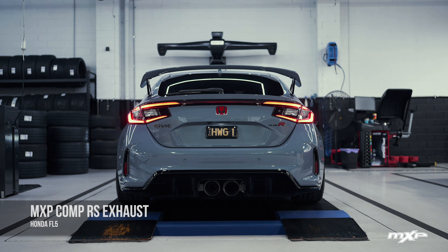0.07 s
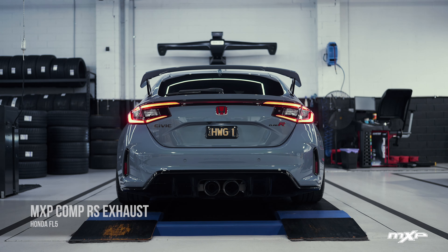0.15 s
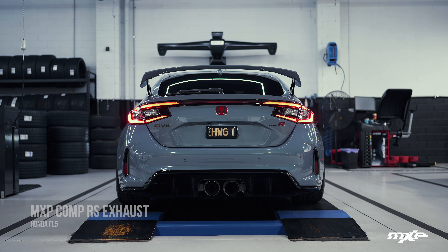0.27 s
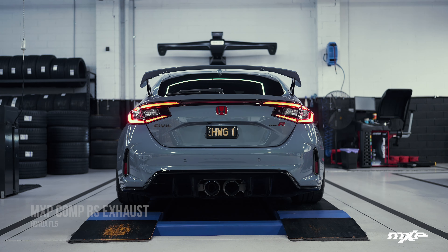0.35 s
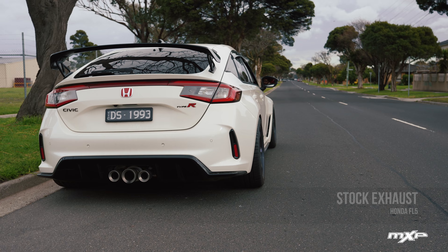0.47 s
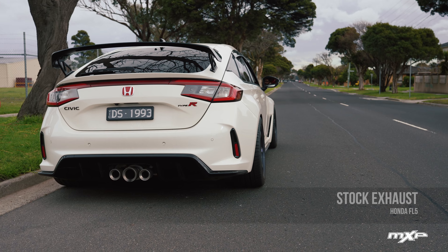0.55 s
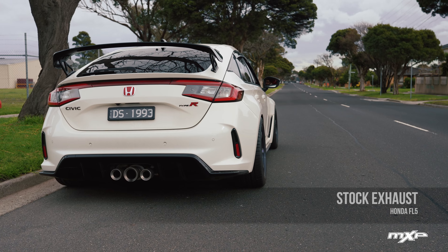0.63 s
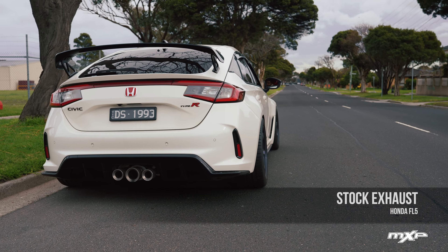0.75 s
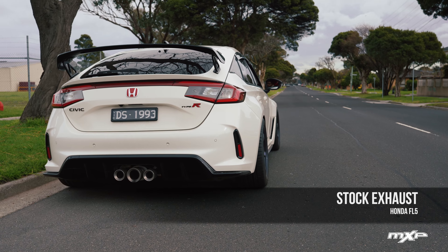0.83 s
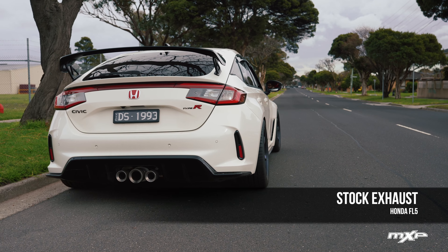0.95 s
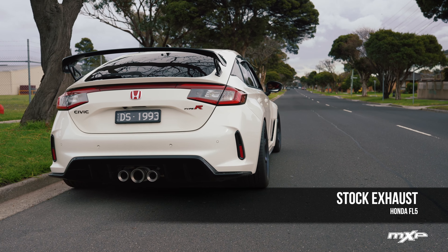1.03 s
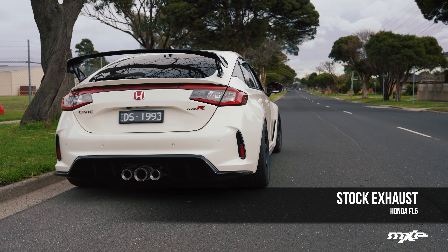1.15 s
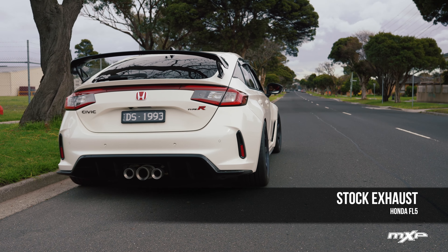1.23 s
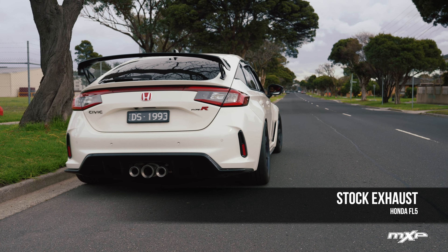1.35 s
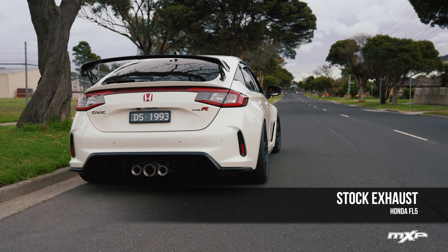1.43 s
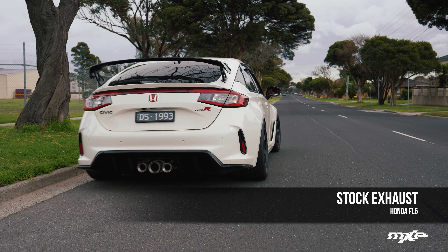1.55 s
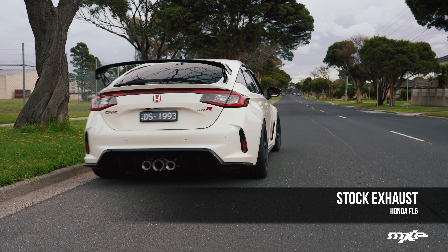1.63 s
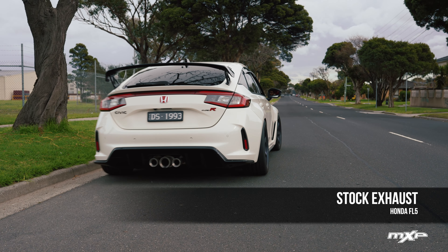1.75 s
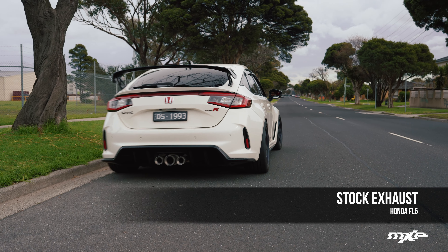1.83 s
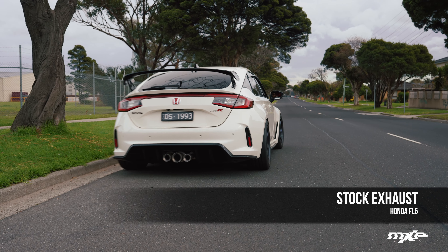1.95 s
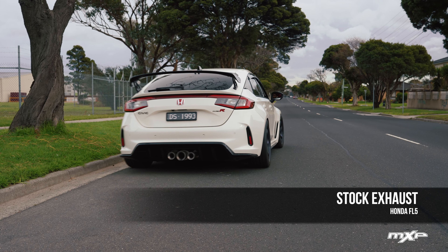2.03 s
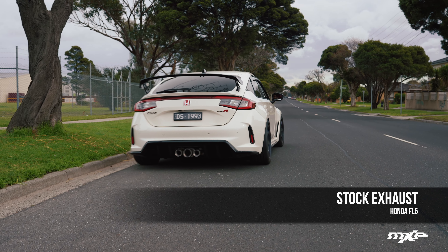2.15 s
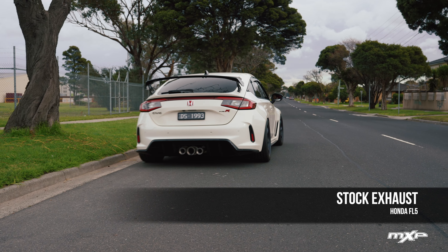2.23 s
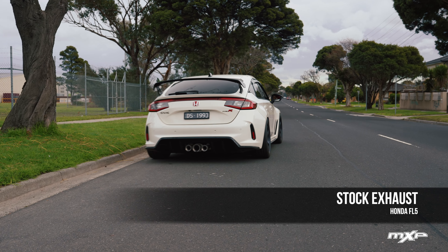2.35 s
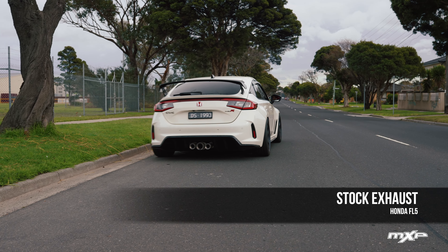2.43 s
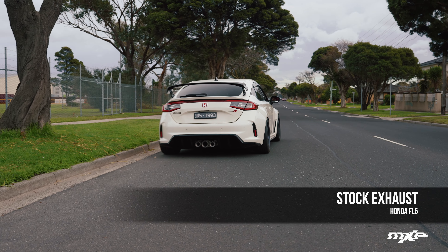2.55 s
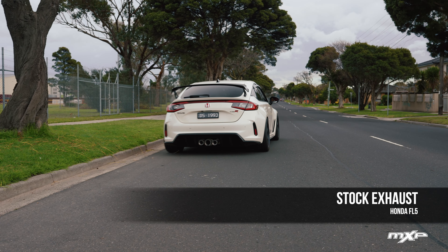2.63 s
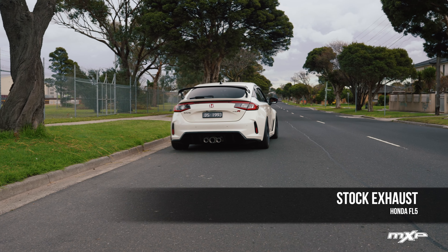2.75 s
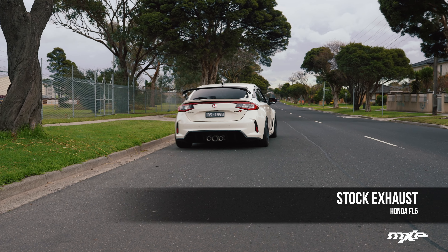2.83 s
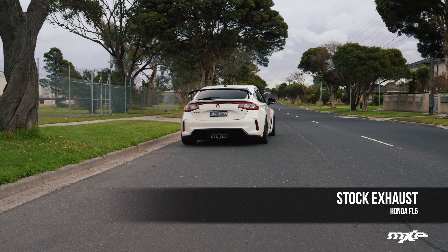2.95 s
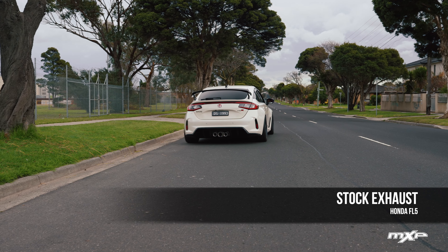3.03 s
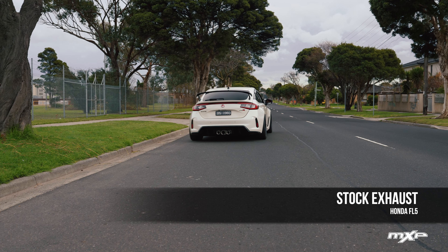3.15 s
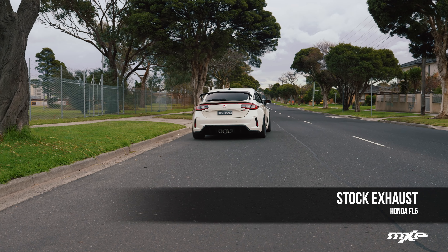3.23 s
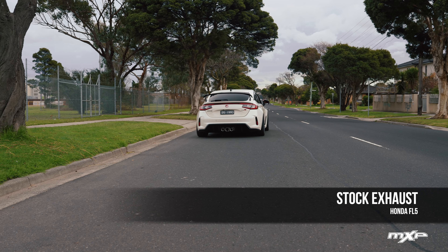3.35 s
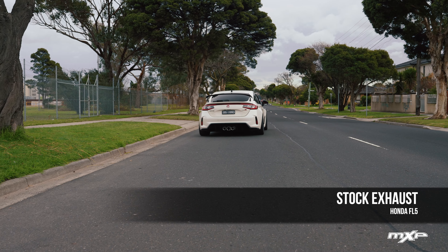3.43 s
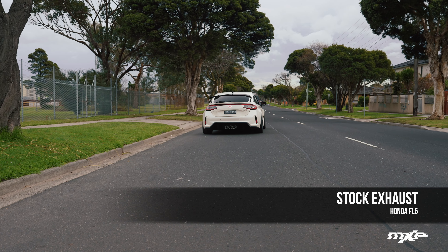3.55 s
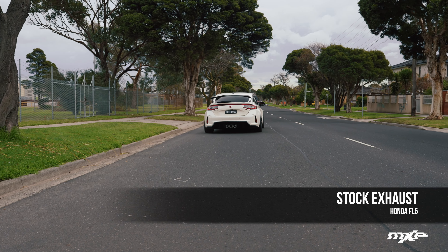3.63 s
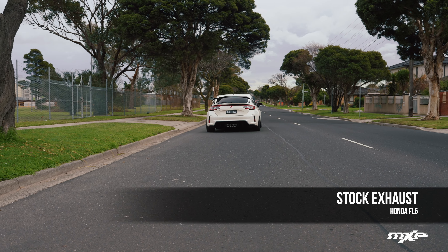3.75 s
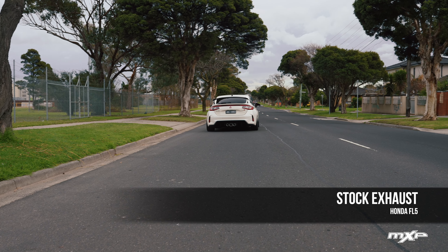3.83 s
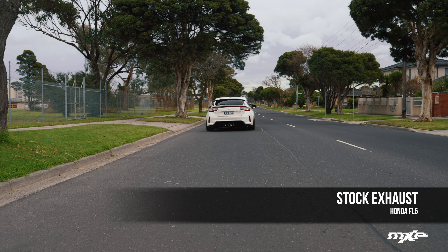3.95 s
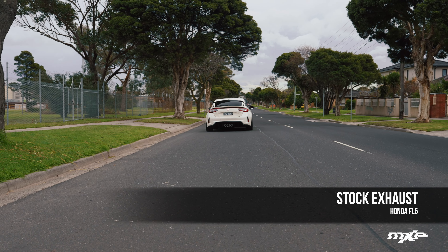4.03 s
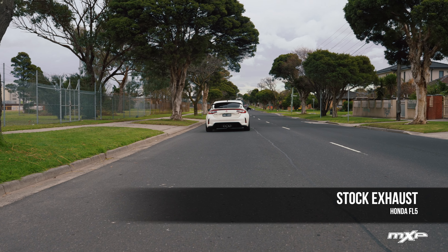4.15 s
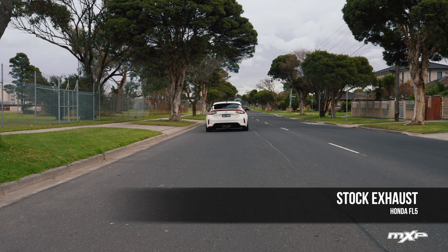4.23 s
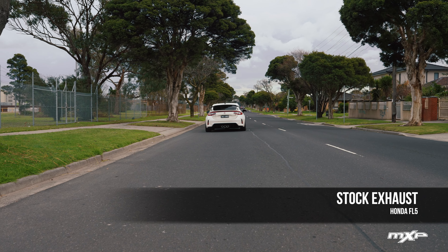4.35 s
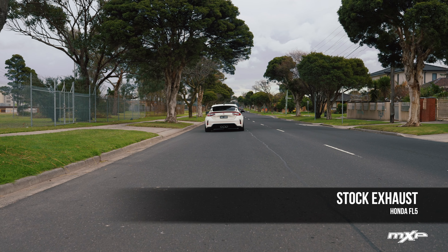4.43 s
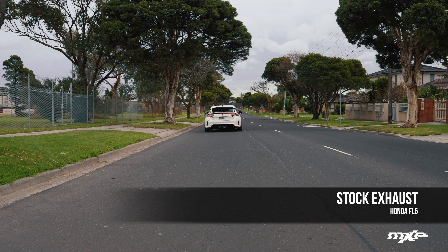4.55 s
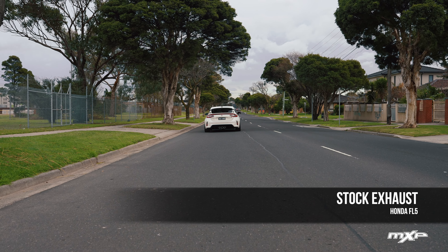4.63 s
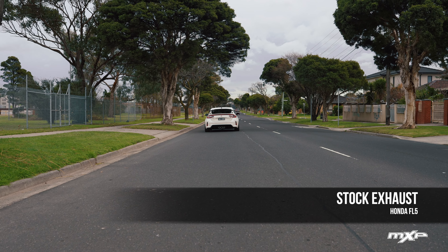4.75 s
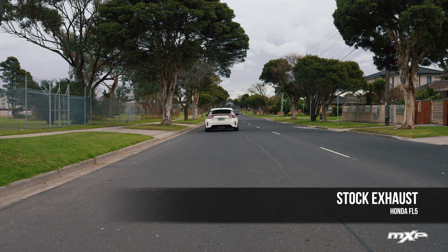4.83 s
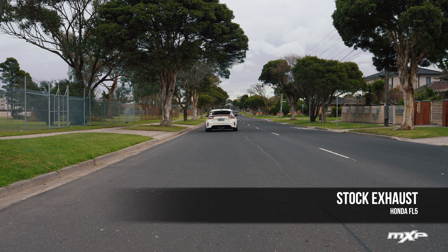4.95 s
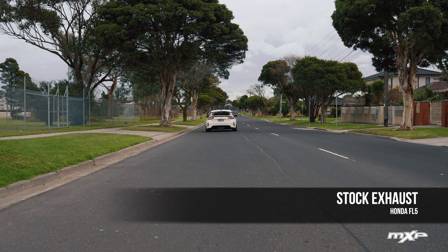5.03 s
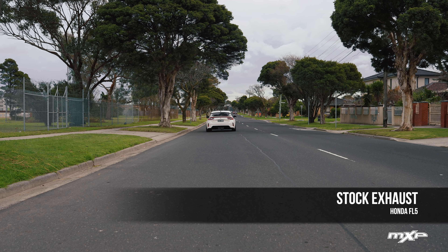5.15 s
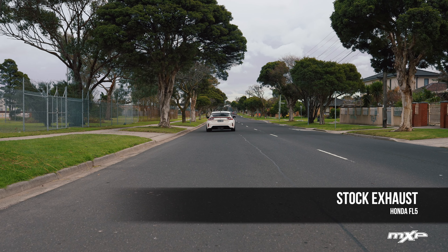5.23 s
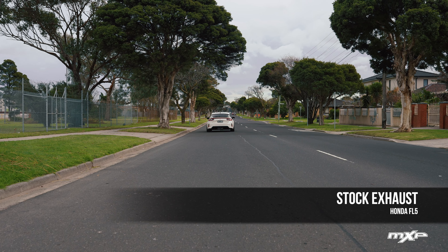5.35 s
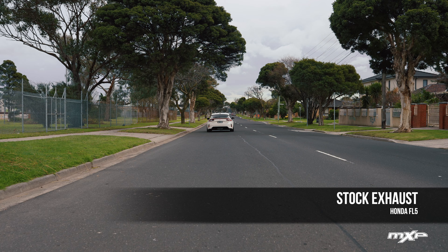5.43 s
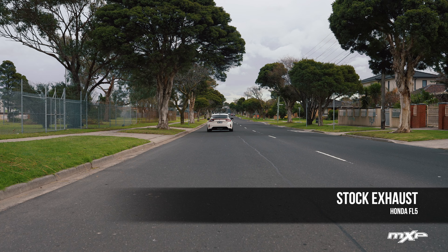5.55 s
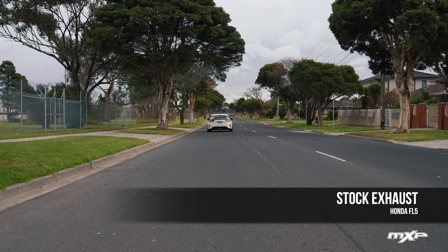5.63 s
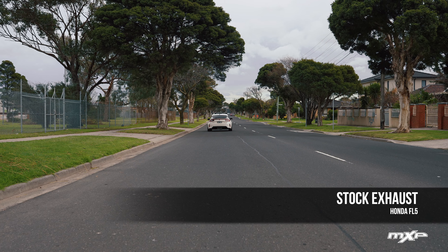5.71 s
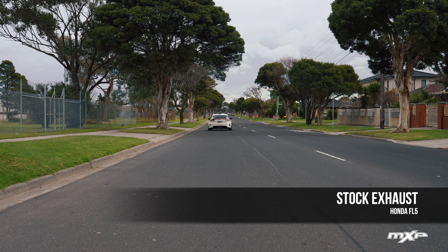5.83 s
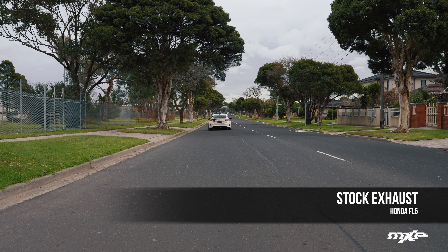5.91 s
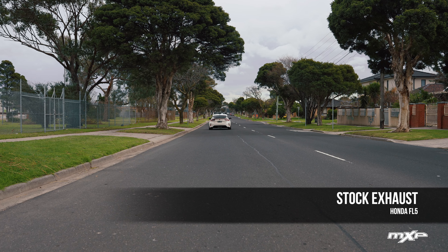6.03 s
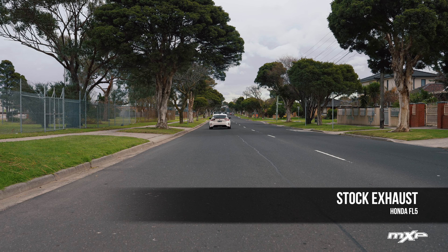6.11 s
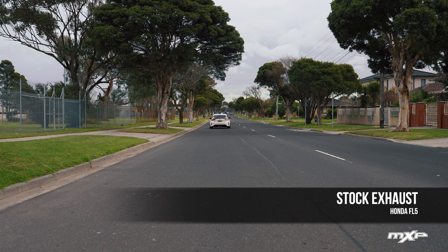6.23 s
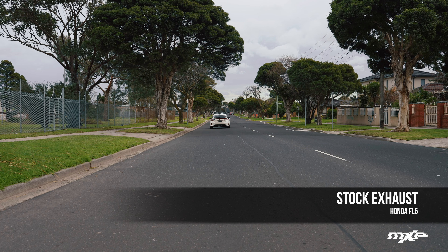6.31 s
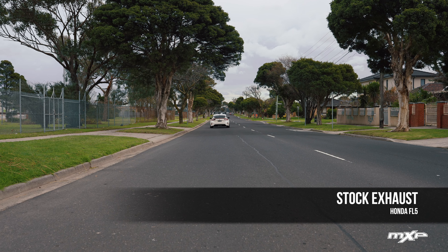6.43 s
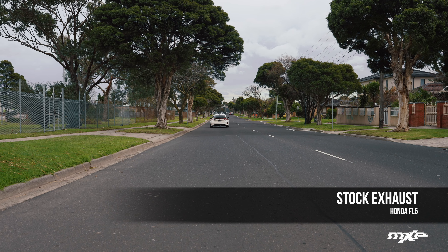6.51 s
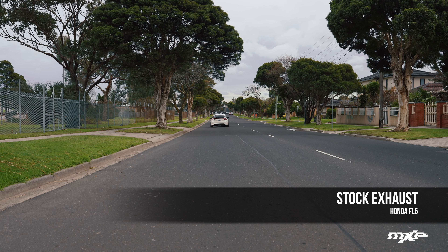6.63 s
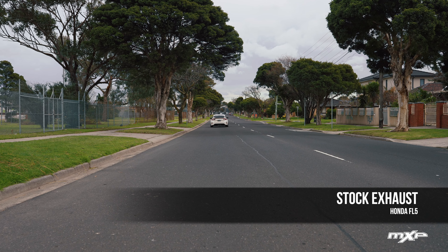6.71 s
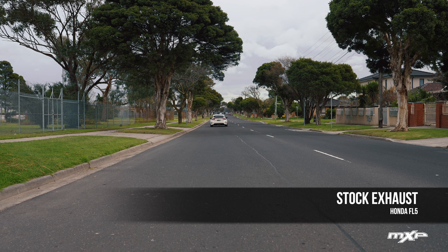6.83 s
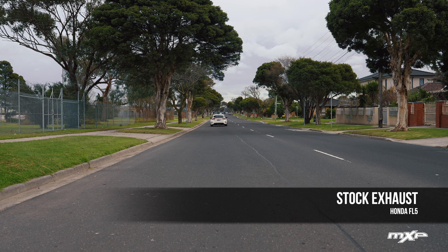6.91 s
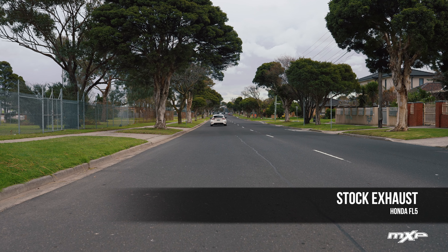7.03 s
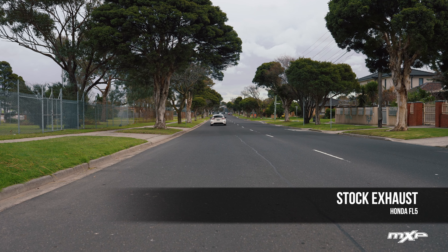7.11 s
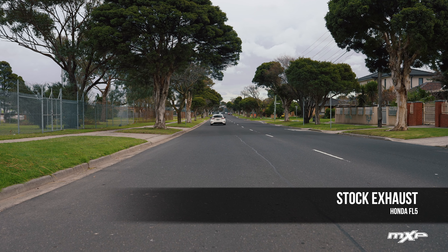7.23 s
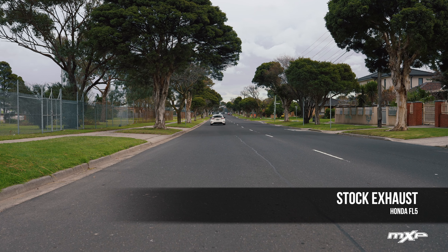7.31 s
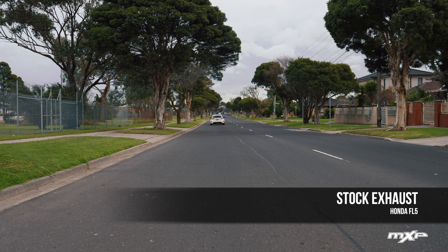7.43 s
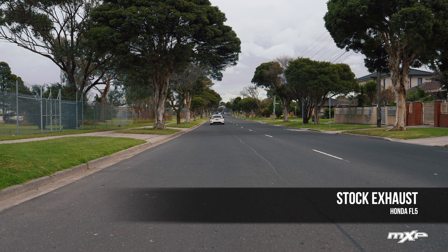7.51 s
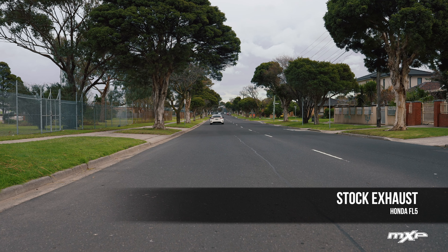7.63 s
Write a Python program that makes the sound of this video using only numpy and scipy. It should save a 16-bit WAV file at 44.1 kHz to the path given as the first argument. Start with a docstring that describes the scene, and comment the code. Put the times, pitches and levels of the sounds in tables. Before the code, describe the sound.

After a brief indoor exhaust idle, a hatchback launches outdoors, its raspy note climbing twice with gear-change dips, receding amid wind and birdsong.

```python
"""A four-cylinder turbo car throbs at a fast idle in a workshop; this fades into a street where a car pulls away.
From 5 m off it revs through first gear, sinks for the change, pulls again in second and lifts off far away.
Firing pulses and smooth low orders ring in a filter shaped like the exhaust pipe; the idle is a sum of orders.
Coloured noise makes tyre roar, gas hiss, street hum and wind on the microphone; gliding sines whistle as birds."""
import sys
import numpy as np
from scipy import signal
from scipy.fft import rfft, irfft, next_fast_len
from scipy.io import wavfile
from scipy.ndimage import uniform_filter1d

SR = 44100
rng = np.random.default_rng(int(sys.argv[2]) if len(sys.argv) > 2 else 0)


def generate_wav(sig):
    """Save sig (samples, or channels by samples) to the path in sys.argv[1] as 16-bit PCM at SR."""
    pcm = np.round(np.clip(np.atleast_2d(sig).T, -1, 1) * 32767).astype(np.int16)
    wavfile.write(sys.argv[1], SR, pcm)


N = 338247
TIME = np.arange(N) / SR
# padded transform length [samples] and its frequencies [Hz]
SIZE = 2 * next_fast_len(N // 2 + SR // 4)
FREQS = np.maximum(np.arange(SIZE // 2 + 1) * SR / SIZE, 1)

# Street air. Wind on the microphone, colour: (frequency [Hz], relative level [dB])
WIND_COLOUR = [(10, -7.5), (22, -3.5), (36, -4.5), (55, -7), (80, -12.5), (130, -22.5), (250, -32),
               (600, -59)]
# low hum of the street, colour: (frequency [Hz], relative level [dB])
STREET_COLOUR = [(25, 5), (60, -3.5), (110, -3.5), (200, -6), (300, -5.5), (420, -15.5), (520, -20),
                 (1000, -21)]
# gusts on the microphone: (time [s], half-width [s], level before trim [dB])
GUST_EVENTS = [(1.078, 0.094, -33), (1.843, 0.092, -34.5), (2.281, .06, -37), (2.48, 0.079, -33.5),
               (2.8, .06, -39), (3.345, .07, -41), (3.7, .12, -40), (4.6, 0.099, -47), (5.04, 0.089, -51),
               (5.79, 0.063, -43), (6.179, .1, -41.5), (7.233, 0.13, -46)]
# the car's wake at the microphone, the distance where it dies away, and a light breeze
WAKE_DB, WAKE_REACH_M, BREEZE_DB = -36, 10.4, -51
# hum level at the median tyre roar, and its rise per dB of roar
HUM_DB, HUM_FOLLOWS = -52, 0.23
# bird whistles: (time [s], length [s], start, middle and end pitch [Hz], level before trim [dB])
BIRD_WHISTLES = [(0.495, 0.037, 2710, 2780, 2700, -73), (0.798, 0.068, 3500, 3550, 3520, -74),
                 (3.663, 0.064, 2210, 2380, 2430, -60.5), (3.645, 0.04, 2750, 2974, 3220, -81),
                 (3.752, 0.054, 2300, 2380, 2470, -57.5), (4.183, .055, 2560, 2620, 2380, -66),
                 (4.325, 0.063, 2110, 2290, 2310, -65), (4.532, .04, 2600, 2695, 2510, -67.5),
                 (4.596, 0.092, 2330, 2660, 2640, -65), (5.04, 0.039, 2200, 2380, 2200, -61.5),
                 (5.096, 0.026, 2860, 2720, 2820, -66), (5.148, 0.049, 2360, 2260, 2520, -58.5),
                 (5.163, 0.04, 2950, 3160, 3180, -62.5), (5.326, 0.064, 3700, 3490, 3720, -68),
                 (5.422, 0.029, 4330, 4200, 3960, -76), (5.521, 0.065, 2710, 2770, 2930, -64),
                 (6.479, 0.047, 3500, 3570, 3570, -66.5), (6.74, 0.11, 2515, 2380, 2630, -63),
                 (6.941, 0.064, 3460, 3520, 3130, -63), (6.948, 0.047, 2750, 2710, 2560, -63),
                 (7.001, 0.14, 3180, 3130, 3070, -71)]
# echoes from fences and house fronts: (delay [s], level [dB])
STREET_ECHOES = [(.047, -21), (.113, -23), (.21, -25), (.34, -25), (.52, -28)]

# Workshop. Strength of each idle order: (multiple of the firing rate, level [dB rms])
IDLE_ORDERS = [(.5, -59), (1, -33.5), (1.5, -50), (2, -41), (2.5, -36.5), (3, -50.5), (3.5, -59),
               (4, -51.5), (4.5, -52), (5, -71), (5.5, -80), (7, -70), (8, -67.5), (9, -66)]
# idle speed: (time [s], firing rate [firings/s])
IDLE_SPEED = [(0, 55.8), (0.5, 54.7)]
# fade of the workshop: (time [s], gain)
WORKSHOP_FADE = [(0, 0.9), (0.1, 0.73), (0.2, 0.85), (0.41, 0.74), (0.47, 0.38), (0.52, 0.021)]
# hiss of the workshop, colour: (frequency [Hz], relative level [dB])
WORKSHOP_COLOUR = [(200, 5), (320, 3), (420, -2.5), (750, -8.5), (1200, -12.5), (1600, -14.5), (2400, -20),
                   (3600, -16), (5000, -29.5), (7000, -37.5), (9500, -40.5), (11500, -39.5), (13500, -45),
                   (15000, -48)]
# unsteadiness of each idle order, and hiss level before trim
IDLE_WAVER_DB, WORKSHOP_DB = .9, -51.5

# Moving car. Engine speed as heard: (time [s], firing rate [firings/s])
ENGINE_SPEED = [(0.5, 38), (0.7, 42), (0.85, 51.8), (0.96, 53.3), (1.1, 50.2), (1.26, 44), (1.92, 39.5),
                (2.2, 49.5), (2.35, 56.5), (2.66, 70.5), (3.0, 89.5), (3.3, 105.3), (3.55, 120.4),
                (3.78, 121.2), (4.2, 106.5), (4.8, 90.8), (4.92, 80.5), (5.6, 91.8), (6.05, 103),
                (6.3, 110.3), (6.7, 124.9), (6.82, 120.5), (6.95, 122.5), (7.35, 107), (7.67, 99)]
# pulls on the throttle: (opens [s], starts to shut [s], first bark [dB], last bark [dB],
# lag of every second pulse at the reference rate [cycles])
THROTTLE_PULLS = [(0.731, 1.86, -16.5, -20.5, 0.018), (2.034, 3.327, -16.5, -14.5, 0.015),
                  (4.524, 6.693, -19, -13, .022)]
THROTTLE_OPENS_S, THROTTLE_SHUTS_S = 0.066, 0.2
# distance at the start, moment of launch, and the steady acceleration
START_M, LAUNCH_S, ACCELERATION_M_PER_S2 = 5, 0.91, 3.2

# Tyres and gas. Tyre colour: (frequency [Hz], relative level [dB])
TYRE_COLOUR = [(100, -19.5), (250, -8.5), (400, -9), (500, -9.5), (700, -3), (1000, 0), (1350, -2),
               (1900, -14), (3000, -26), (5000, -41.5)]
# tyre roar on the asphalt: (time [s], level before trim [dB])
TYRE_ROAR = [(0.5, -68), (1.2, -63), (2.5, -56.5), (3.4, -51), (3.9, -51.5), (4.35, -56.5), (5.0, -52),
             (5.5, -50.5), (6.6, -47), (6.85, -44), (7.2, -47.5), (7.67, -49)]
# tailpipe hiss, colour: (frequency [Hz], relative level [dB])
HISS_COLOUR = [(500, 3.5), (1200, -4.5), (2000, 1.5), (2700, -2), (3500, 0), (3950, -4.5), (4400, -15.5),
               (5000, -23), (7000, -50.5)]
# fine treble of the hiss, colour: (frequency [Hz], relative level [dB])
SPRAY_COLOUR = [(3000, -10), (4500, 3), (6000, 2.5), (8000, -1.5), (10000, -7), (11500, -6), (13000, -13),
                (15000, -12.5)]
# gas leaving the tailpipes: (time [s], hiss level before trim [dB])
GAS_FLOW = [(0.55, -72.5), (0.93, -66.5), (1.7, -66.5), (3.0, -59), (3.65, -58), (5.0, -68), (5.7, -63.5),
            (6.4, -65.5), (6.85, -61.5), (7.2, -67.5), (7.67, -68)]
# short spits of hiss: (time [s], half-width [s], level [dB])
HISS_SPITS = [(0.932, .025, -70.5), (2.858, 0.014, -65), (3.578, 0.066, -75), (6.68, .15, -78)]
# treble relative to the hiss, its gain with load, and its loss in the air
SPRAY_DB, SPRAY_LOAD_DB, SPRAY_LOSS_DB_PER_M = -17, 3, 0.21

# Exhaust. Overall slope of the pipe: (frequency [Hz], level [dB])
PIPE_SLOPE = [(20, -15), (50, -7), (150, 7), (185, -4), (270, -4), (320, -6.5), (380, -9), (440, -6.5),
              (480, -23.5), (700, -31.5), (850, -28.5), (1020, -21), (1400, -36.5), (2500, -45.5)]
# standing waves of the pipe: (frequency [Hz], half-width [Hz], lift [dB])
PIPE_MODES = [(219.5, 52.4, 12.5), (348, 56, 8.5), (416.8, 38, 7), (543, 65, 8.5), (614.3, 60, 18.5),
              (832, 220, 6.5), (910, 450, 6.5)]
# exhaust strength as heard: (time [s], level before trims [dB])
EXHAUST_EFFORT = [(0.55, -57), (0.87, -32), (0.93, -25.5), (1.17, -27.5), (1.38, -34.5), (1.9, -33),
                  (2.1, -30), (2.5, -31.5), (3.0, -25), (3.33, -19.5), (3.74, -24), (3.93, -39),
                  (4.48, -40.5), (4.58, -35.5), (5.05, -40.5), (5.55, -39), (6.18, -31), (6.74, -33.5),
                  (6.8, -33.5), (7.1, -44.5), (7.67, -52.5)]
# carrying of a low order as it sweeps through the pipe: (frequency [Hz], level [dB])
LOW_ORDER_BOOM = [(40, 1), (52, 1.5), (65, -9.5), (82, -17), (105, -14.5), (135, -7.5), (178, -11),
                  (212, -6.5), (245, -6), (280, -16), (370, -17)]
# burbles as the throttle shuts: (time [s], level [dB])
OVERRUN_BURBLES = [(3.811, -39), (3.87, -43.5), (3.93, -41.5), (4.071, -40), (4.171, -41.5)]
# burbling gas, gas inside the pipe and rasp at its mouth, colours: (frequency [Hz], relative level [dB])
BURBLE_COLOUR = [(150, -5), (230, 9), (320, -7.5), (600, 1.5), (1000, -21)]
GAS_COLOUR = [(120, -6), (250, 0), (450, 0), (1000, -5), (2500, -9)]
RASP_COLOUR = [(600, -12), (950, 0), (1300, -6), (2200, -18), (4000, -26)]
# turbulence beside the pulses: inside the pipe, and at its mouth at the reference rate
GAS_DB, RASP_DB = -19, -26
# steady differences in strength between pairs of cylinders and between single ones [shares]
PAIR_BIAS, CYLINDER_BIAS = .06, .04
# chance in the timing of the pulses
JITTER_CYCLES = .003
# random spread of strength [shares], and the efforts between which firing turns ragged off the throttle
SPREAD_LOADED, SPREAD_SLACK = .11, .36
LOADED_DB, SLACK_DB = -30.5, -44.5
# firing rate [firings/s] at which limp, pulse front and rasp are given
REFERENCE_RATE = 100
# limp grows as this power of the rate; the pulse front steepens with each octave
LIMP_POWER, FRONT_DB, FRONT_DB_PER_OCTAVE = 1.2, -2.5, 6.5
# shut throttle: bark, change of the pulse front, loss of the upper low orders, limp
COAST_BARK_DB, COAST_FRONT_DB = -27.5, -10.5
COAST_LOSS_DB_PER_ORDER, COAST_LIMP_CYCLES = 3.2, 0.018

CUTOFF_HZ = 15000


def from_db(db):
    """Decibels to gain."""
    return 10 ** (np.asarray(db) / 20)


def in_time(rows):
    """Each column of a curve table at every sample."""
    s, *columns = np.transpose(rows)
    return [np.interp(TIME, s, c) for c in columns]


def colour_db(points):
    """A spectrum table at every frequency, falling 20 dB per octave beyond its ends."""
    hz, db = np.transpose(points)
    octaves_outside = np.abs(np.log2(FREQS / np.clip(FREQS, hz[0], hz[-1])))
    return np.interp(np.log(FREQS), np.log(hz), db) - 20 * octaves_outside


def drift(rate):
    """Random wander of rms about 1, joined by straight lines between this many new values a second."""
    return np.interp(TIME * rate, np.arange(4000), rng.standard_normal(4000)) / np.sqrt(2 / 3)


def noise(points, band):
    """Coloured noise whose part inside a band [Hz] has rms 1."""
    spectrum = rfft(rng.standard_normal(SIZE)) * from_db(colour_db(points))
    inside = (FREQS > band[0]) & (FREQS < band[1])
    return irfft(spectrum)[:N] / np.std(irfft(spectrum * inside))


def running_rms(x):
    """Level over about a tenth of a second."""
    power = uniform_filter1d(uniform_filter1d(x * x, size=3500), size=3500)
    return np.sqrt(np.abs(power) + 1e-14)


def swell(s, half_width):
    """A smooth rise and fall of height 1 around a moment."""
    return np.exp(-2 * ((TIME - s) / half_width) ** 2)


def distance():
    """Metres from the microphone to the tailpipes under steady acceleration."""
    return START_M + .5 * ACCELERATION_M_PER_S2 * np.maximum(TIME - LAUNCH_S, 0) ** 2


def throttle():
    """Throttle opening (0-1), and the bark (dB) and limp (cycles) that the pulls put on the note."""
    opening, bark_db, limp = 0, COAST_BARK_DB, COAST_LIMP_CYCLES
    for opens, shuts, first_db, last_db, lag in THROTTLE_PULLS:
        press = np.clip((TIME - opens) / THROTTLE_OPENS_S, 0, 1)
        release = np.clip(1 - (TIME - shuts) / THROTTLE_SHUTS_S, 0, 1)
        pedal = press * release
        pull_bark_db = np.interp(TIME, [opens, shuts], [first_db, last_db])
        opening = opening + pedal
        bark_db = bark_db + pedal * (pull_bark_db - COAST_BARK_DB)
        limp = limp + pedal * (lag - COAST_LIMP_CYCLES)
    return opening, bark_db, limp


def outdoor_air(gust_db=1.1):
    """The car's wake, gusts and a breeze buffet the microphone over the low hum of the street."""
    wake = from_db(WAKE_DB) / np.sqrt(1 + (distance() / WAKE_REACH_M) ** 6)
    gusts = sum(from_db(db + gust_db) * swell(s, half_width) for s, half_width, db in GUST_EVENTS)
    wind = np.sqrt(wake ** 2 + gusts ** 2 + from_db(BREEZE_DB) ** 2)
    roar_db, = in_time(TYRE_ROAR)
    hum = from_db(HUM_DB + HUM_FOLLOWS * (roar_db - np.median(roar_db)))
    return wind * noise(WIND_COLOUR, band=(15, 36)) + hum * noise(STREET_COLOUR, band=(60, 500))


def birds(waver=0.01, level_db=2.0):
    """Short whistles from the trees: sines on curved pitch paths, with a slight flutter of pitch."""
    out, wobble = np.zeros(N), 1 + waver * drift(250)
    for start, length, first_hz, middle_hz, last_hz, db in BIRD_WHISTLES:
        at = np.flatnonzero((TIME >= start) & (TIME < start + length))
        along = (TIME[at] - start) / length
        curve = np.polyfit([0, .5, 1], [first_hz, middle_hz, last_hz], 2)
        hz = np.polyval(curve, along) * wobble[at]
        envelope = np.sqrt(np.abs(np.sin(np.pi * along)))
        out[at] += from_db(db + level_db) * envelope * np.sin(2 * np.pi * np.cumsum(hz) / SR)
    return out


def street_echoes(x, wall_hz=900):
    """A few dull, late copies come back from both sides of the street."""
    dull = signal.sosfilt(signal.butter(2, wall_hz, fs=SR, output="sos"), x)
    return x + sum(from_db(db) * np.interp(TIME - delay, TIME, dull, left=0) for delay, db in STREET_ECHOES)


def workshop_idle(smear=0.68, chuff=0.13, air_db=0.8):
    """Idle orders throb, their phases smeared by the room, with a hiss that chuffs at each firing."""
    rate, = in_time(IDLE_SPEED)
    phase = 2 * np.pi * np.cumsum(rate) / SR
    throb = 0
    for order, db in IDLE_ORDERS:
        gain = from_db(db + IDLE_WAVER_DB * drift(18))
        half_order = np.round(2 * order) / 2
        throb = throb + gain * np.cos(half_order * phase + smear * rng.standard_normal())
    air = from_db(WORKSHOP_DB + air_db) * noise(WORKSHOP_COLOUR, band=(280, 15000))
    return np.sqrt(2) * throb + air * (1 + chuff * np.cos(phase))


def rush(tyre_db=-2.23, hiss_db=-1.0, flutter_db=0.23):
    """Tyres roar on the asphalt and gas hisses from the tailpipes, wavering in the moving air."""
    roar_db, = in_time(TYRE_ROAR)
    roar = from_db(roar_db + tyre_db + flutter_db * drift(11)) * noise(TYRE_COLOUR, band=(750, 1800))
    spits = sum(from_db(db) * swell(s, half_width) for s, half_width, db in HISS_SPITS)
    flow = from_db(in_time(GAS_FLOW)[0] + hiss_db) + spits
    hiss = flow * from_db(flutter_db * drift(18)) * noise(HISS_COLOUR, band=(2000, 4200))
    # load raises the fine treble; the air soaks it up with distance
    load = throttle()[0] * (in_time(ENGINE_SPEED)[0] / REFERENCE_RATE) ** 3
    spray_db = SPRAY_DB + SPRAY_LOAD_DB * load - SPRAY_LOSS_DB_PER_M * distance()
    spray = flow * from_db(spray_db + flutter_db * drift(35)) * noise(SPRAY_COLOUR, band=(5000, 12000))
    return roar + hiss + spray


def burbles(pipe, spread_s=0.026):
    """Late burns on the overrun send soft gulps of gas through the pipe."""
    gulps = sum(from_db(db) * np.exp(-.5 * ((TIME - s) / spread_s) ** 2) for s, db in OVERRUN_BURBLES)
    boom = pipe(noise(BURBLE_COLOUR, band=(150, 700)))
    return gulps * boom / running_rms(boom)


def engine_state(rate, waver_db=1.12, slack_bark_db=9):
    """Effort, throttle and revs set the gains of three low orders and the bark, and the raggedness."""
    effort, = in_time(EXHAUST_EFFORT)
    opening, bark_db, _ = throttle()
    hz, boom_db = np.transpose(LOW_ORDER_BOOM)
    low_orders = []
    for k in range(1, 4):
        carried_db = np.interp(np.log(k * rate), np.log(hz), boom_db)
        coast_loss_db = COAST_LOSS_DB_PER_ORDER * (k - 1) * (1 - opening)
        low_orders.append(from_db(effort + carried_db + waver_db * drift(9) - coast_loss_db))
    slack = np.clip((effort - LOADED_DB) / (SLACK_DB - LOADED_DB), 0, 1) * (1 - opening)
    bark = from_db(effort + bark_db + slack_bark_db * slack)
    rough = SPREAD_LOADED + (SPREAD_SLACK - SPREAD_LOADED) * slack
    return low_orders, bark, rough


def pipe_response():
    """The exhaust's slope and standing waves as a causal (minimum-phase) filter."""
    modes_db = sum(lift * np.exp(-2 * ((FREQS - hz) / width) ** 2) for hz, width, lift in PIPE_MODES)
    # folding the cepstrum onto positive time gives minimum phase
    cepstrum = irfft(np.log(from_db(colour_db(PIPE_SLOPE) + modes_db)))
    cepstrum[1:SIZE // 2] *= 2
    cepstrum[SIZE // 2 + 1:] = 0
    return np.exp(rfft(cepstrum))


def exhaust(tones_db=1.4, bark_db=-0.8, rasp_db_per_octave=-3.5):
    """One pressure pulse per firing rings in the pipe; turbulent gas puffs out with each."""
    rate, = in_time(ENGINE_SPEED)
    octaves = np.log2(rate / REFERENCE_RATE)
    low_orders, bark, rough = engine_state(rate)
    opening, _, limp = throttle()
    limp = limp * (rate / REFERENCE_RATE) ** LIMP_POWER
    firing_phase = 2 * np.pi * (np.cumsum(rate) / SR + .0015 * drift(45))
    # every second pulse arrives a little late, which puts lines between the orders
    phase = firing_phase + 2 * np.pi * limp * np.cos(firing_phase / 2)
    response = pipe_response()

    def pipe(x):
        """Sound passed through the pipe filter."""
        return irfft(rfft(x, SIZE) * response)[:N]

    # the three lowest orders are smooth tones
    booms = [pipe(np.cos(k * phase)) for k in range(1, 4)]
    tones = sum(gain * boom / running_rms(boom) for gain, boom in zip(low_orders, booms))

    # the four cylinders differ steadily, and every burn differs by chance
    burn = np.interp(firing_phase / (2 * np.pi), np.arange(2000), rng.standard_normal(2000))
    pair = PAIR_BIAS * np.cos(firing_phase / 2)
    single = CYLINDER_BIAS * np.sin(firing_phase / 4 + np.pi / 4)
    strength = 1 + pair + single + rough * burn

    # a pulse lasts a set crank angle, so it shortens as the revs rise
    fired = phase + 2 * np.pi * JITTER_CYCLES * drift(110)
    pulses = sum(from_db(-.04 * k * k) * np.cos(k * fired) for k in range(4, 23))
    puff = (.5 + .5 * np.cos(phase - .6)) ** 2 * strength
    gas = from_db(GAS_DB) * (.5 + puff) * noise(GAS_COLOUR, band=(280, 480))
    ringing = pipe(strength * pulses + gas)

    # the pulse front steepens with revs and softens on a shut throttle
    front_db = FRONT_DB + FRONT_DB_PER_OCTAVE * octaves + COAST_FRONT_DB * (1 - opening)
    front = signal.sosfiltfilt(signal.butter(4, 450, "high", fs=SR, output="sos"), ringing)
    ringing = ringing + (from_db(front_db) - 1) * front
    # level the ringing by its bark band
    bark_band = signal.butter(3, [280, 700], "band", fs=SR, output="sos")
    ringing = ringing / running_rms(signal.sosfiltfilt(bark_band, ringing))

    rasp = puff * noise(RASP_COLOUR, band=(600, 4000))
    rasp = rasp * from_db(RASP_DB + rasp_db_per_octave * octaves)
    return from_db(tones_db) * tones + bark * (from_db(bark_db) * ringing + rasp) + burbles(pipe)


def scene(edge_s=0.0022):
    """The workshop cross-fades into the street; both ends open and close softly."""
    indoors = np.clip(in_time(WORKSHOP_FADE)[0], 0, 1)
    outdoors = np.interp(TIME, [.42, .53], [0, 1])
    street = outdoor_air() + street_echoes(birds(), wall_hz=5000) + rush() + street_echoes(exhaust())
    edges = np.sin(np.pi / 2 * np.minimum(np.minimum(TIME, TIME[::-1]) / edge_s, 1)) ** 2
    return (edges * (indoors * workshop_idle() + outdoors * street))[None]


def record(dry):
    """A steep low-pass cuts the top of the treble."""
    return signal.sosfilt(signal.ellip(10, .1, 80, CUTOFF_HZ, fs=SR, output="sos"), dry)


dry = scene()
out = record(dry)
generate_wav(out)
```